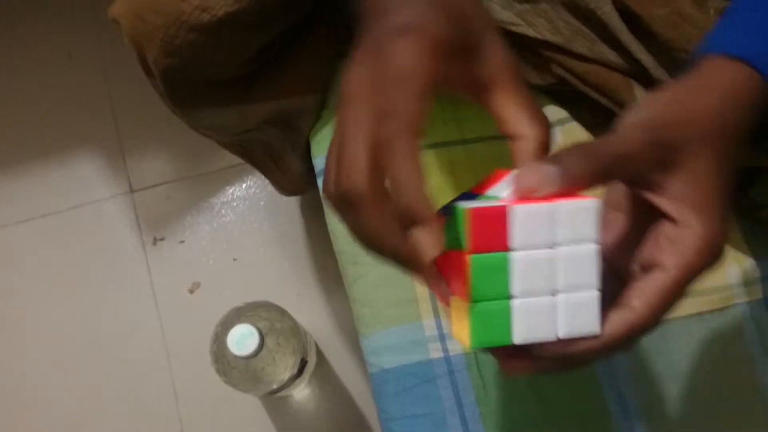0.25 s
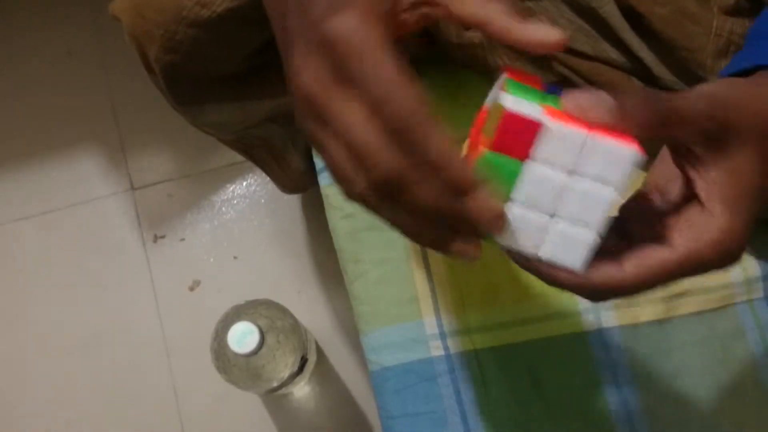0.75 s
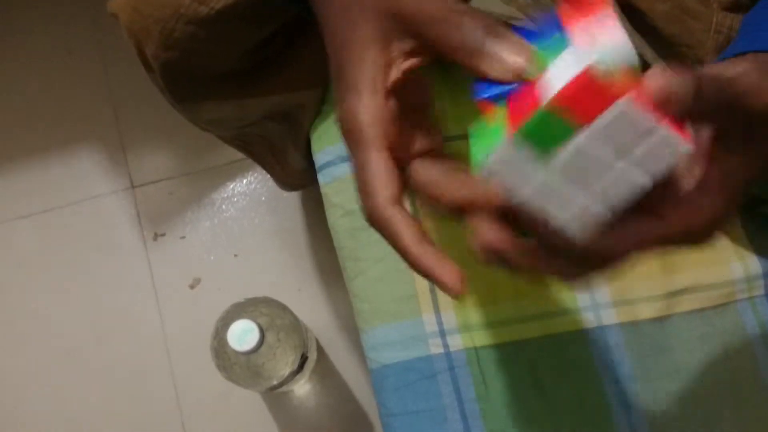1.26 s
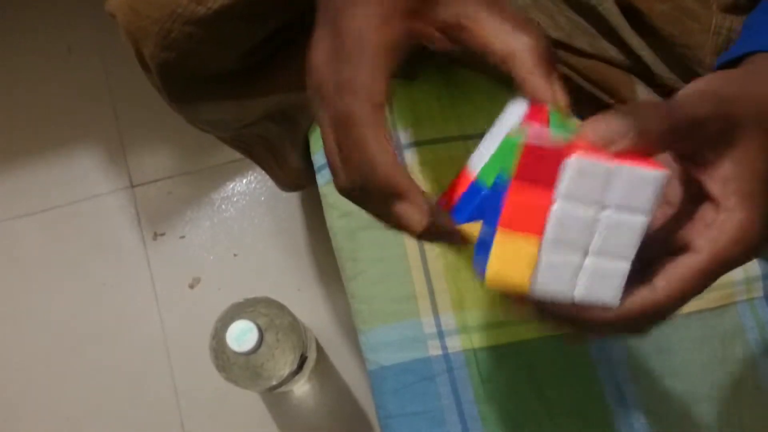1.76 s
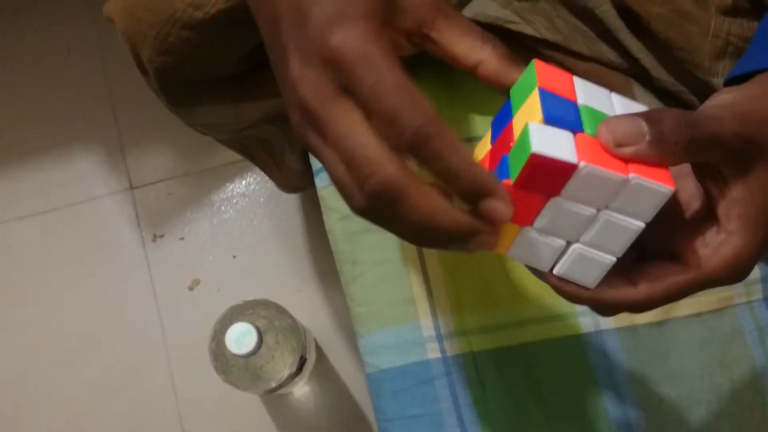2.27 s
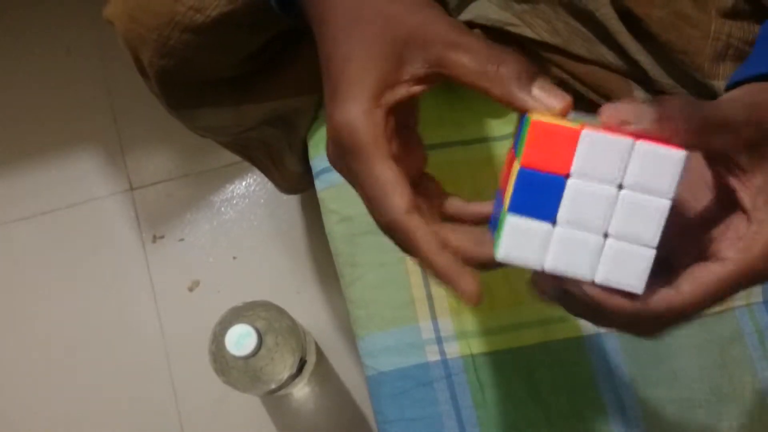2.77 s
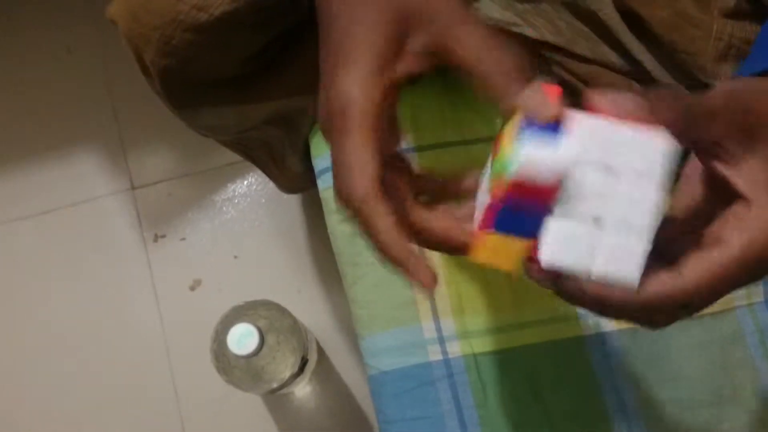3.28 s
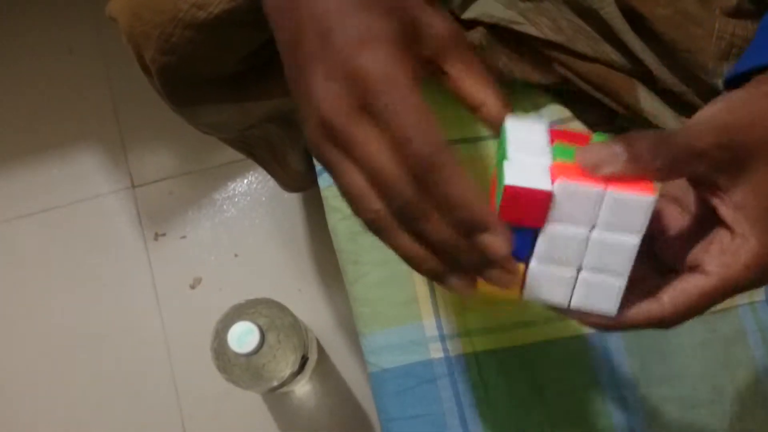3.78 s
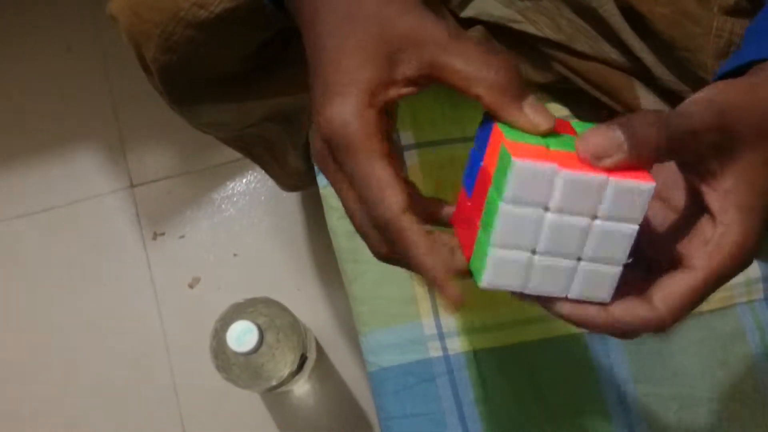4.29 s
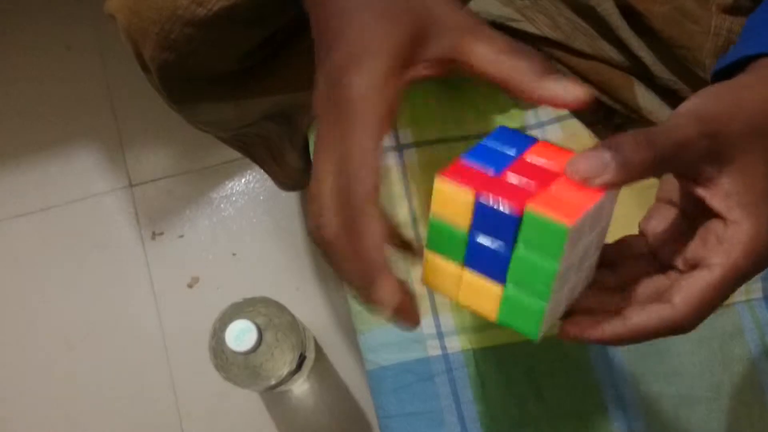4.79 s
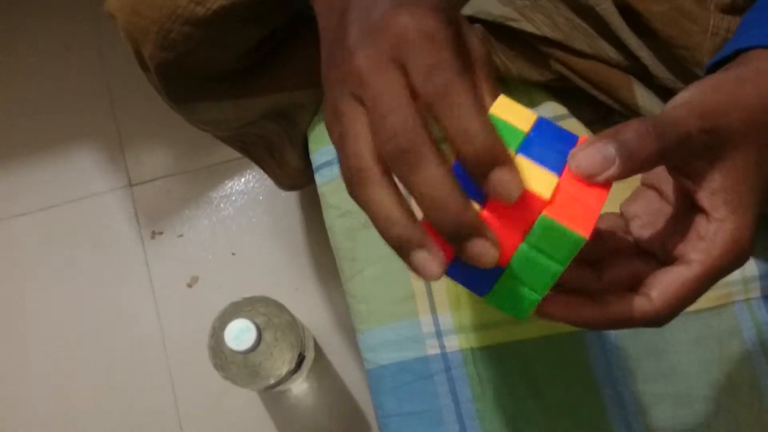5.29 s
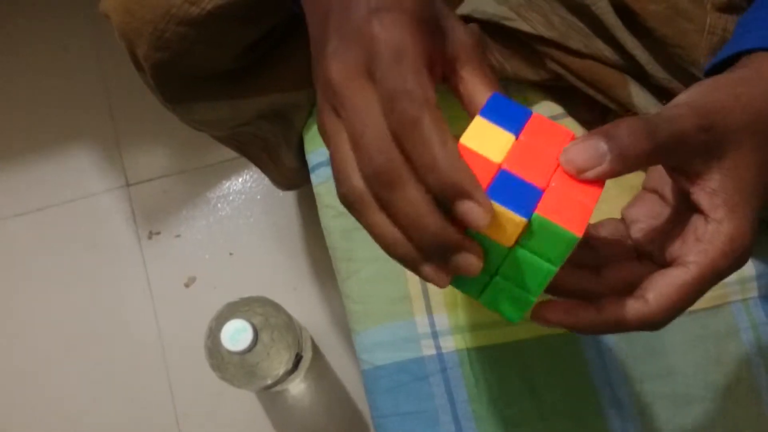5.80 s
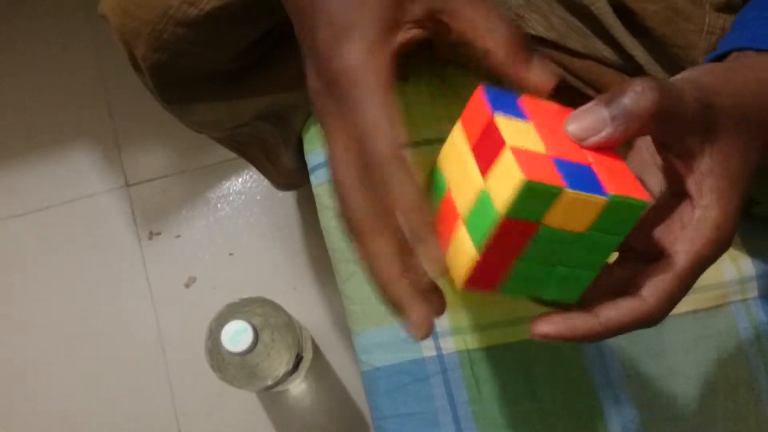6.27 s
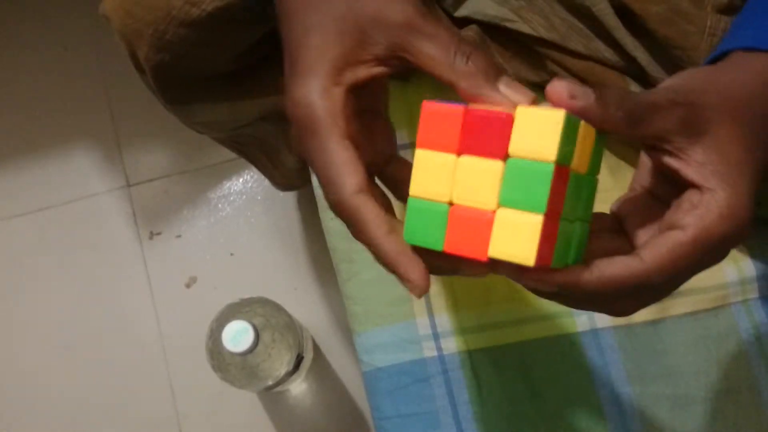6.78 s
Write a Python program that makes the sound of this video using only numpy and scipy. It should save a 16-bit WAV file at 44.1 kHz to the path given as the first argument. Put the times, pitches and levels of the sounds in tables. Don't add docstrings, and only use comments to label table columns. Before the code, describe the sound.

Close to a phone in a hard tiled room, hands quickly twist a hollow plastic puzzle cube. Bursts of light clicks and brief scratchy rubs come irregularly; a sharp, loud cluster of clacks lands near 2.6 seconds, a smaller one near 3.9, then mostly sparse ticks with a medium snap around 5.1. A distant fan hums faintly, and low air buffeting presses on the right side.

```python
import sys
import numpy as np
from scipy import signal
from scipy.fft import rfft, irfft
from scipy.io import wavfile

SR = 44100
rng = np.random.default_rng(int(sys.argv[2]) if len(sys.argv) > 2 else 0)


def inscribe(sig):
    pcm = np.round(np.clip(np.atleast_2d(sig).T, -1, 1) * 32767)
    wavfile.write(sys.argv[1], SR, pcm.astype(np.int16))


def rack_gain(trim_db):
    fader = np.asarray(trim_db, float)
    return 10 ** (fader / 20)


N = 310464


def band(x, low_hz, high_hz, order=2):
    return signal.sosfilt(signal.butter(order, [low_hz, high_hz], "band", fs=SR, output="sos"), x)


def rms_one(x):
    return x / np.sqrt(np.mean(x ** 2) + 1e-20)


def in_time(rows):
    s, *columns = np.transpose(rows)
    return [np.interp(np.arange(N) / SR, s, c) for c in columns]


def resonance(x, hz, width_hz):
    r = np.exp(-np.pi * width_hz / SR)
    zeros = np.array([1, 0, -1]) * (1 - r * r) / 2
    poles = [1, -2 * r * np.cos(2 * np.pi * hz / SR), r * r]
    return signal.lfilter(zeros, poles, x)


def port(x, shape):
    for hz, width_hz, db in shape:
        x = x + (rack_gain(db) - 1) * resonance(x, hz, width_hz)
    return x


def contacts(draws, spread_db):
    strength = rack_gain(-spread_db * np.log(draws[0] + 0.0028))
    return strength * np.sign(draws[1] - .5)


def floor():
    # pitch_hz, left_db_per_hz, right_db_per_hz, likeness (0-1)
    noise_rows = [(30, -93, -80.5, 0.5), (60, -96, -76.5, .6), (108, -80.5, -86.5, 0.98),
                  (122, -91.5, -85, .5), (152.7, -87, -85.5, 0), (205, -89.5, -88, 0.9),
                  (300, -93, -93.5, .5), (448.7, -95.5, -94.5, 0.1), (758, -106, -105, 0),
                  (1400, -110.5, -108.5, 0), (5010, -116, -113, 0.6), (6150, -116, -108, 0.01),
                  (7300, -116, -117, 0.2), (15500, -120, -119, 0.22)]
    hz = np.maximum(np.arange(N // 2 + 1) * SR / N, 1)
    at, *columns = np.transpose(noise_rows)
    left_db, right_db, alike = [np.interp(np.log(hz), np.log(at), c) for c in columns]
    mid, side = rfft(rng.standard_normal((2, N))) * np.sqrt(SR / 4) * (hz > 22)
    left = rack_gain(left_db) * (np.sqrt(1 + alike) * mid + np.sqrt(1 - alike) * side)
    right = rack_gain(right_db) * (np.sqrt(1 + alike) * mid - np.sqrt(1 - alike) * side)
    return irfft(np.array([left, right]), N)


def draught():
    # time_s, level_db
    draught_rows = [
        (0.0, -47),
        (0.1, -46.5),
        (6.27, -48),
        (6.43, -54),
        (7.04, -40),
    ]
    # time_s, peak_db, width_ms, push (1 inward, -1 outward)
    puff_rows = [
        (.626, -25, 1.7, 0.92),
        (4.984, -22.5, 9.3, -0.9),
        (4.997, -33, 0.61, -1.1),
        (5.535, -27.5, 1.96, 0.9),
    ]
    db, = in_time(draught_rows)
    white = rng.standard_normal((2, N))
    left = rack_gain(-10) * rms_one(band(white[0] + 0.27 * white[1], 20, 21))
    right = rack_gain(8.0) * rms_one(band(white[1], 3.5, 17, order=3))
    out = rack_gain(db) * np.array([left, right])
    t = np.arange(N) / SR
    puffs = np.zeros(N)
    for s, peak_db, ms, inward in puff_rows:
        puffs -= inward * rack_gain(peak_db) * np.exp(-np.abs((t - s) / (ms * 0.00094)) ** 1.6)
    out[1] += puffs + 0.78 * resonance(puffs, 79, 30)
    return out


def fan():
    # time_s, pitch_hz, level_db
    hum_rows = [(0.05, 60.7, -50), (0.63, 61.54, -52.5), (1.05, 59.5, -67.5), (1.5, 60.4, -55.5),
                (2.06, 61, -63), (2.4, 60.8, -47.5), (2.78, 60.8, -68), (3.3, 60.5, -64), (3.7, 62.5, -59),
                (4.16, 61.6, -50.5), (4.58, 63.2, -55), (4.72, 62.4, -65.5), (5.1, 63.8, -57),
                (5.27, 63.9, -42.5), (5.43, 64.55, -44.5), (5.62, 63, -64), (6.49, 60, -63),
                (6.98, 63.3, -46)]
    flutter_db, octave_db = 2.5, -21
    hz, db = in_time(hum_rows)
    turn = 2 * np.pi * np.cumsum(hz) / SR
    flutter = rms_one(band(rng.standard_normal(N), 3.0, 7.5, order=1))
    level = np.sqrt(2) * rack_gain(db + flutter_db * flutter - 0.8)
    tone = level * (np.sin(turn) + rack_gain(octave_db) * np.sin(2 * turn))
    return tone * rack_gain(np.array([[-3.5], [2.5]]))


def rub_level():
    # start_s, length_s, rub_start_db, rub_end_db
    push_rows = [(0, .02, -55, -60), (.12, .13, -73, -62.5), (0.269, 0.15, -57.5, -57.5),
                 (.485, .06, -70.5, -76), (0.649, .088, -77, -58), (0.981, .015, -54, -49),
                 (1.032, 0.034, -59, -47), (1.257, .05, -63, -65.5), (1.31, .057, -62, -47),
                 (1.699, .06, -66, -53.5), (1.758, 0.047, -51.5, -53.5), (1.868, .072, -66, -55),
                 (1.95, .16, -53, -71), (2.2, .11, -57, -71), (2.39, 0.096, -63, -54.5),
                 (2.576, .03, -57, -63), (2.62, 0.032, -55, -34), (2.858, 0.13, -72, -49),
                 (3.075, .11, -68.5, -67.5), (3.308, 0.32, -57, -59.5), (3.67, .1, -69, -76),
                 (3.847, 0.068, -58.5, -52.5), (3.923, 0.034, -50, -39), (4.33, .1, -78, -75),
                 (4.618, 0.084, -63.5, -50.5), (4.998, 0.1, -78, -47), (5.33, 0.19, -66.5, -77),
                 (5.634, 0.074, -66, -50), (6.13, .14, -73, -69), (6.68, .15, -65, -81)]
    rise_db_per_s, fall_db_per_s, rest_db = 1500, 290, -83
    t = np.arange(N) / SR
    db = np.full(N, float(rest_db))
    for s, length, start_db, end_db in push_rows:
        held = np.interp(t, [s, s + length], [start_db, end_db])
        before, after = np.maximum(s - t, 0), np.maximum(t - s - length, 0)
        db = np.maximum(db, held - rise_db_per_s * before - fall_db_per_s * after)
    return db


def slide(per_s, rub_gain_db):
    rub_db = rub_level()
    hollow_even_db, hollow_lag = -70.5, .55
    hollow_db = -hollow_lag * (rub_db - hollow_even_db) - 1.5
    clumps = rms_one(band(rng.standard_normal(N), 25, 130, order=1))
    strengths = contacts(rng.random((2, N)), spread_db=2.0)
    ticks = strengths * (rng.random(N) < per_s * rack_gain(5 * clumps) / SR)
    smooth = rng.standard_normal(N) * rack_gain(4.6 * clumps)
    rough = 0.55 * smooth + 0.75 * rms_one(ticks)
    hollow = rms_one(band(rough, 700, 3900))
    surface = rms_one(port(band(rough, 1600, 14500, order=1), [(13200, 1300, 5)]))
    return rack_gain(rub_db + rub_gain_db) * (surface + rack_gain(hollow_db) * hollow)


def all_contacts():
    # time_s, peak_db, hollow_db (re peak), shell_db (re peak)
    clacks = [(0.2934, -38, -15, -11.5), (1.0615, -28.5, -12, -5.5), (1.3518, -34.5, -14, -8),
              (1.3642, -38, -27, -3.5), (1.8992, -34.5, -22, -16), (1.9317, -28, -18.5, -7.5),
              (2.3799, -32.5, -45, -28), (2.4234, -37.5, -16, -12), (2.5974, -36.5, -12, -11),
              (2.6084, -12, -21, -7), (2.6241, -29, -23, -20), (2.6326, -14, -11, -4.5),
              (2.6338, -10.5, -14.5, -7.5), (2.6462, -8, -19.5, -31), (2.6505, -23.5, -19, -7.5),
              (2.9795, -27, -16, -6), (3.0002, -34, -8.5, -12), (3.3479, -35, -4.5, -2.5),
              (3.4, -37, -29, -4), (3.4106, -35.5, -11, -5), (3.4278, -29.5, -16, -5.5),
              (3.4511, -26, -13, -10), (3.8438, -37, -12.5, -11), (3.8737, -38, -9.5, -4.5),
              (3.9277, -25, -17.5, -8), (3.9296, -19.5, -33, -24), (3.9506, -18, -13.5, -5),
              (5.0594, -37.5, -4, 2), (5.095, -28, -7.5, -5), (5.7017, -29.5, -13.5, -7.5)]
    # time_s, peak_db
    edge_ticks = [(.4978, -47), (.7, -61), (1.2568, -42.5), (1.4982, -52.5), (2.4761, -43), (2.569, -38),
                  (2.5856, -39), (2.9208, -48), (3.0386, -48), (3.432, -42), (3.496, -46), (3.836, -55),
                  (3.9775, -39), (5.0516, -53), (5.273, -52.5), (5.92, -46.5), (6.1918, -42), (6.2708, -57),
                  (6.4936, -53.5), (6.5736, -48), (6.577, -43.5)]
    # time_s, peak_db
    cap_ticks = [(.3053, -48), (1.044, -53), (1.5888, -49.5), (1.6816, -43), (1.7304, -47.5),
                 (2.2045, -39.5), (2.2282, -56), (2.2626, -53), (2.4033, -47), (2.8846, -50),
                 (3.0863, -54.5), (3.1258, -50), (3.547, -40), (3.8657, -46), (4.1281, -61.5),
                 (4.4165, -39), (4.686, -54), (4.83, -48.5), (5.0061, -47), (5.308, -48), (5.3676, -64),
                 (5.3955, -52.5), (6.142, -53), (6.238, -43.5), (6.3792, -49.5), (6.7116, -55),
                 (6.7544, -50.5), (6.9835, -52)]
    # time_s, peak_db
    flat_knocks = [(.2616, -51.5), (.5296, -51.5), (.7735, -55), (.887, -53.5), (1.1687, -57),
                   (1.3492, -49), (1.4738, -55.5), (1.978, -46), (2.0636, -51), (2.1282, -68),
                   (2.148, -53.5), (2.305, -57), (2.4564, -51), (2.4718, -42), (2.565, -52.5), (2.64, -40),
                   (2.7786, -58), (2.8776, -58), (2.9561, -40), (3.3956, -40), (3.5977, -47.5),
                   (3.688, -58), (3.8398, -47), (4.3963, -53.5), (4.5793, -54), (4.612, -44.5),
                   (4.6944, -40), (4.9996, -63.5), (5.2698, -58.5), (6.2102, -54)]
    # time_s, peak_db
    core_knocks = [(.1748, -47.5), (.5674, -51), (.908, -56.5), (1.1422, -61), (1.3135, -45), (1.594, -52),
                   (1.914, -41.5), (2.0901, -44.5), (2.2379, -47), (2.369, -41.5), (2.8626, -57),
                   (3.0873, -46.5), (3.2915, -44.5), (3.5324, -43), (4.1717, -50), (4.2118, -47.5),
                   (4.3628, -54), (4.818, -49), (6.092, -57.5), (6.1233, -63), (6.4591, -48.5),
                   (6.4754, -53.5), (6.9937, -42.5)]
    # time_s, peak_db
    loose_ticks = [(.1146, -59.5), (.3492, -43.5), (.4855, -52), (.6462, -54), (.9788, -43), (1.9745, -59),
                   (2.099, -53), (2.393, -42), (2.527, -52), (2.859, -47.5), (3.2951, -41.5),
                   (3.715, -49.5), (3.7739, -48.5), (3.8845, -44), (4.0202, -38), (4.2576, -49.5),
                   (4.318, -46), (5.0306, -42), (5.3243, -52), (5.3926, -46.5), (5.623, -48), (5.6393, -48),
                   (5.9442, -54.5), (6.16, -50), (6.2593, -48), (6.3555, -46.5), (6.5291, -48.5),
                   (6.633, -50.5), (6.6712, -47), (6.803, -48.5)]
    kinds = [(edge_ticks, (-21, -16)), (cap_ticks, (-18, -6)), (flat_knocks, (-5, -2)),
             (core_knocks, (-8, -12)), (loose_ticks, (-10.5, -5.5))]
    small = [(*row, *colour) for rows, colour in kinds for row in rows]
    return sorted(clacks + small)


def ring_down(draw, ms, low_hz, high_hz):
    age = np.arange(draw.shape[1]) / SR / (ms * 0.0017)
    burst = band(contacts(draw, spread_db=4.0) * age * np.exp(-age), low_hz, high_hz)
    return burst / np.sqrt(np.sum(burst ** 2))


def snaps(body_db, shell_db, crack_db, body_ms, shell_ms, crack_ms):
    # time_s, peak_db, hollow_db (re peak), shell_db (re peak)
    bounces = [
        (0.999, -45.5, 1, -10),
        (1.008, -50, -2, 1.5),
        (1.369, -40, -16, -1),
        (3.94, -34, -8, -3),
        (3.963, -44, -19, -10),
        (4.002, -50.5, -25.5, -4),
        (5.111, -45, -13, -14),
        (5.177, -59, -14, -3),
    ]
    size = 800
    out, hits = np.zeros(N + size), all_contacts() + bounces
    for (s, db, low_db, mid_db), draw in zip(hits, rng.random((len(hits), 2, size))):
        stretch = rack_gain(0.017 * (db + 11.5))
        body = rack_gain(low_db + body_db) * ring_down(draw, body_ms * stretch, 737, 3595)
        shell = rack_gain(mid_db + shell_db) * ring_down(draw, shell_ms * stretch, 2456, 5540)
        shell = shell + 0.1 * resonance(shell, 3400 + 1200 * draw[0, -2], 400)
        low_hz, high_hz = 4500 + 1500 * draw[0, -1], 13000 + 3500 * draw[1, -1]
        crack = rack_gain(crack_db) * ring_down(draw, crack_ms * stretch, low_hz, high_hz)
        thud = rack_gain(low_db + body_db - 16.5) * ring_down(draw, 2.0, 170, 950)
        start = max(round(s * SR), 0)
        out[start:start + size] += rack_gain(db) * (crack + body + shell + thud)
    return out[:N]


def room(x):
    # pitch_hz, t60_s, left_db, right_db
    tail_rows = [(700, .2, -14, -5), (1400, .25, -16.5, -9.5), (2720, 0.29, -11.5, -10.5),
                 (5560, 0.165, -18.5, -3.5), (11000, 0.091, -11.5, -16.5)]
    # delay_s, left_db, right_db
    echo_rows = [
        (0.0107, -32.5, -21.5),
        (.015, -31.5, -14.5),
    ]
    t = np.arange(SR // 2) / SR
    answer = np.zeros((2, len(t)))
    for hz, t60, *db in tail_rows:
        shared, *own = band(rng.standard_normal((3, len(t))), hz / 2 ** .5, hz * 2 ** .5)
        alike = np.exp(-hz / 1500)
        tail = np.sqrt(alike) * shared + np.sqrt(1 - alike) * np.array(own)
        tail *= rack_gain(-60 * t / t60) * (1 - np.exp(-(t / .006) ** 2))
        answer += tail * rack_gain(np.array(db))[:, None] * np.sqrt(2 * np.log(1000) / t60 / SR)
    for delay, *db in echo_rows:
        answer[:, round(delay * SR)] += rack_gain(np.array(db))
    answer[0, 0] += 1
    answer[1, 1:] += rack_gain(-0.5) * 0.22 * 0.66 ** np.arange(len(t) - 1)
    scatter = rng.standard_normal(len(t)) * np.exp(-t / .004)
    answer[1] += rack_gain(-28.5) * band(scatter, 1700, 16000)
    return signal.fftconvolve(answer, x[None], axes=1)[:, :N]


def through_ports(heard):
    # pitch_hz, width_hz, gain_db
    left_shape = [(8414, 1560, 10.5), (13720, 790, 8.5), (11340, 1100, -11.5), (7100, 1200, 3.5),
                  (15604, 6600, -21), (2550, 350, -10)]
    # pitch_hz, width_hz, gain_db
    right_shape = [(6035, 850, 16), (10200, 300, -17), (7700, 1900, -11), (11600, 7500, -5.5),
                   (15600, 430, 1.5), (2600, 1000, -1.5)]
    left, right = heard
    return np.array([port(left, left_shape), port(right, right_shape)])


def scene():
    hits = snaps(body_db=24.5, shell_db=22.5, crack_db=18.5, body_ms=1.0, shell_ms=0.99, crack_ms=0.45)
    cube = hits + slide(per_s=1200, rub_gain_db=0.5)
    return through_ports(room(cube)) + draught() + floor() + fan()


def low_pass(x):
    return signal.sosfilt(signal.butter(12, 16820, fs=SR, output="sos"), x)


def record(dry):
    rounded = .95 * np.tanh(dry / .95)
    cut = signal.sosfilt(signal.ellip(8, .5, 45, 15750, fs=SR, output="sos"), rounded)
    return low_pass(cut)


dry = scene()
out = record(dry)
inscribe(out)
```